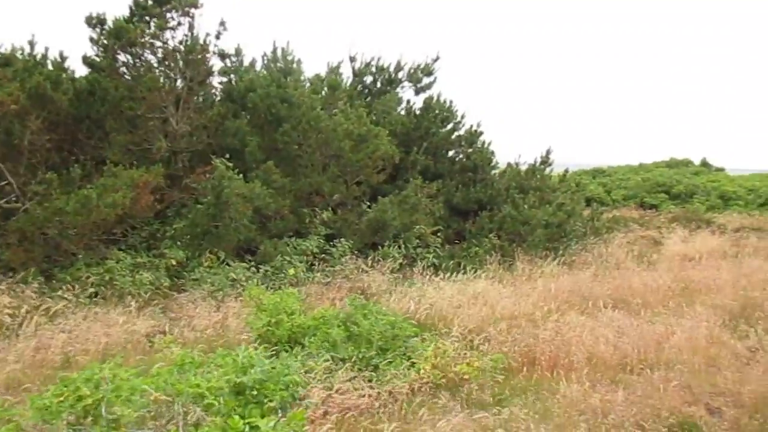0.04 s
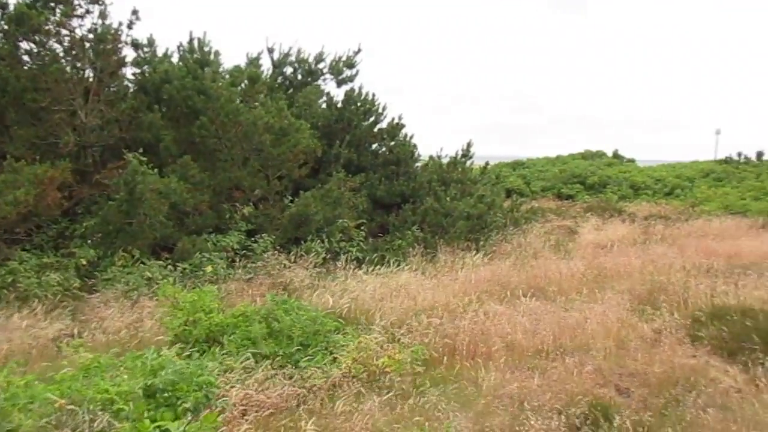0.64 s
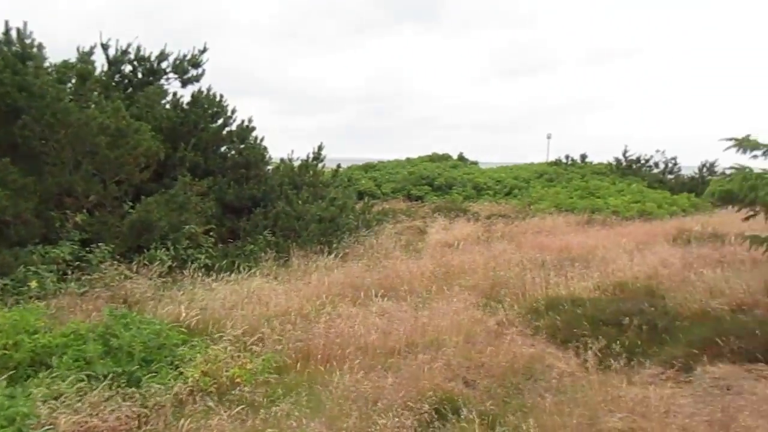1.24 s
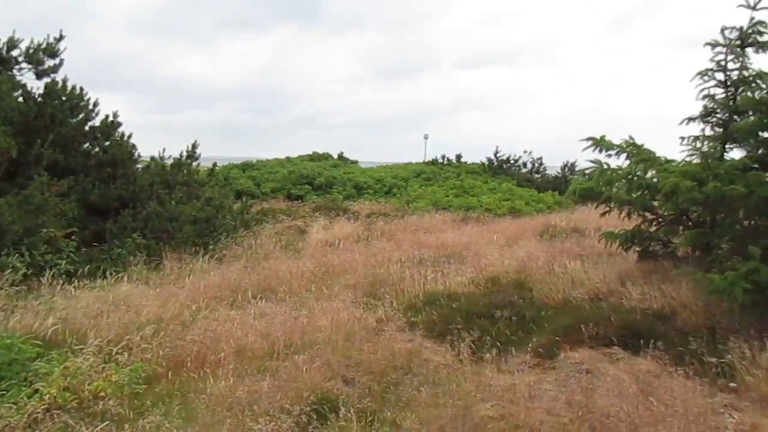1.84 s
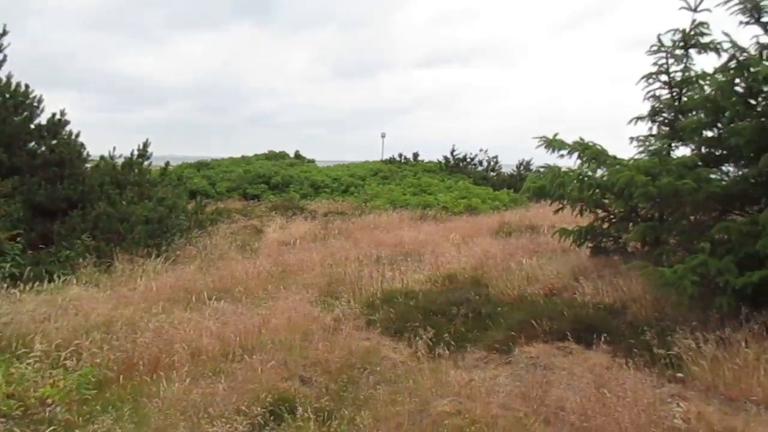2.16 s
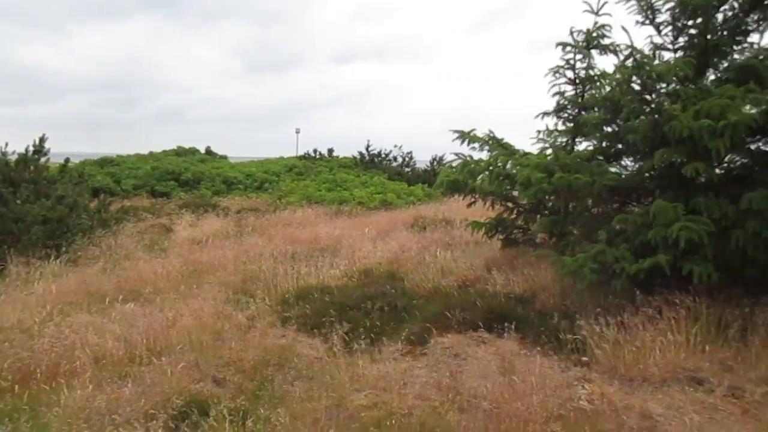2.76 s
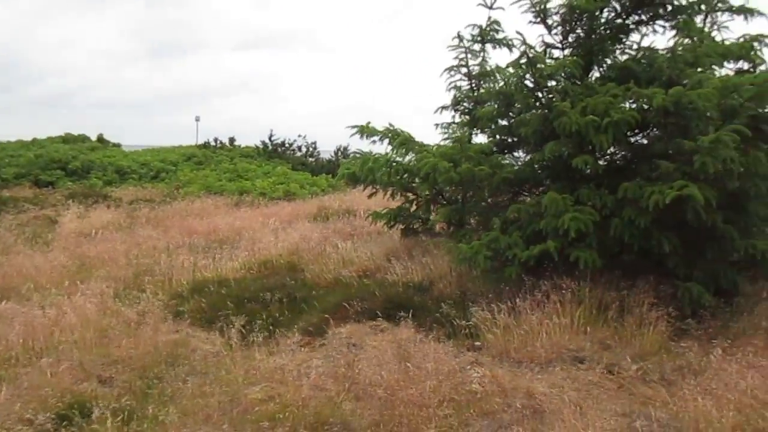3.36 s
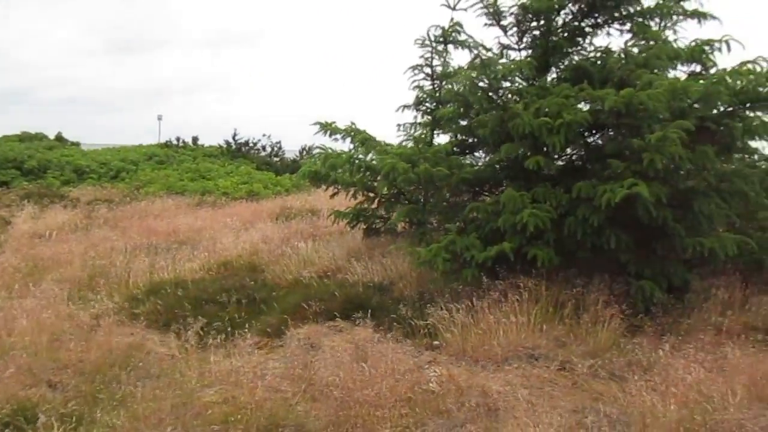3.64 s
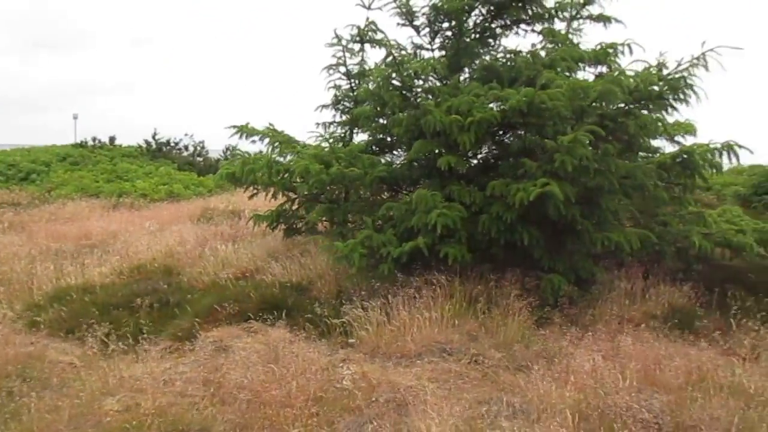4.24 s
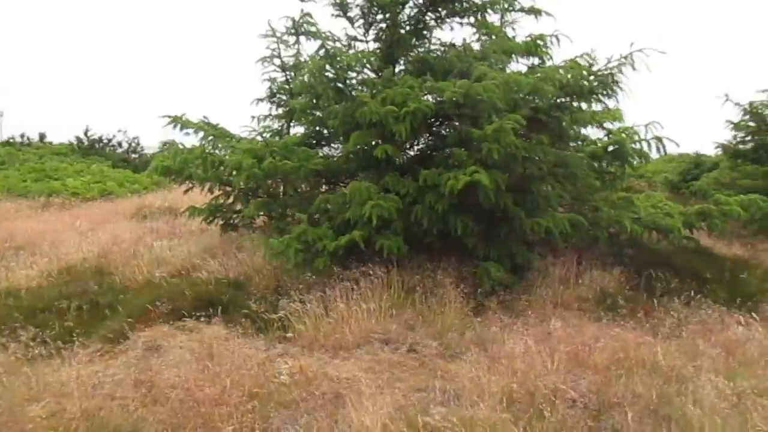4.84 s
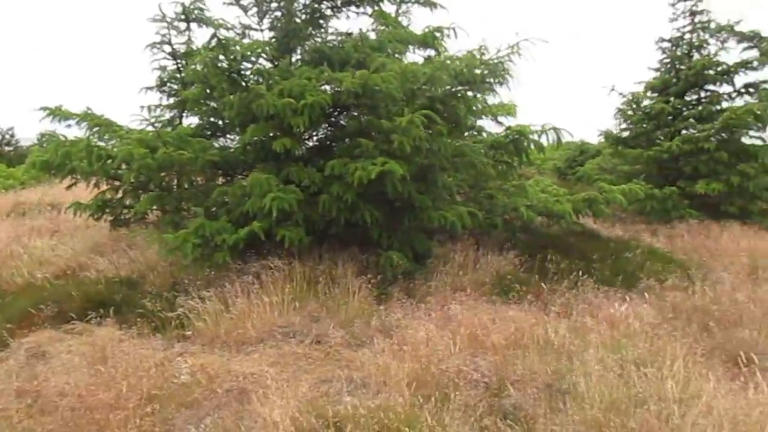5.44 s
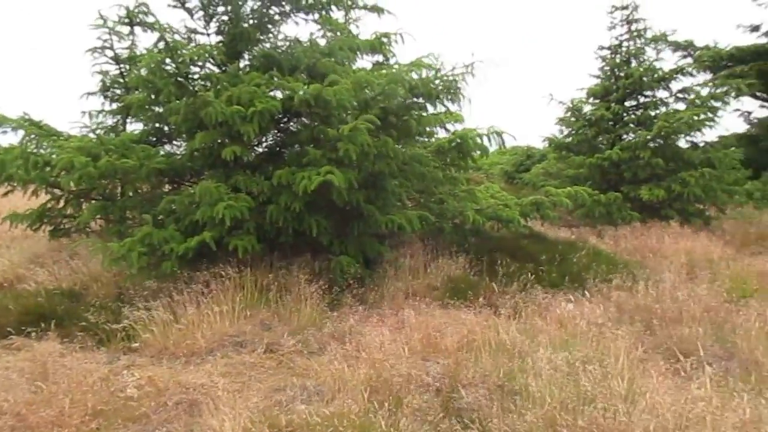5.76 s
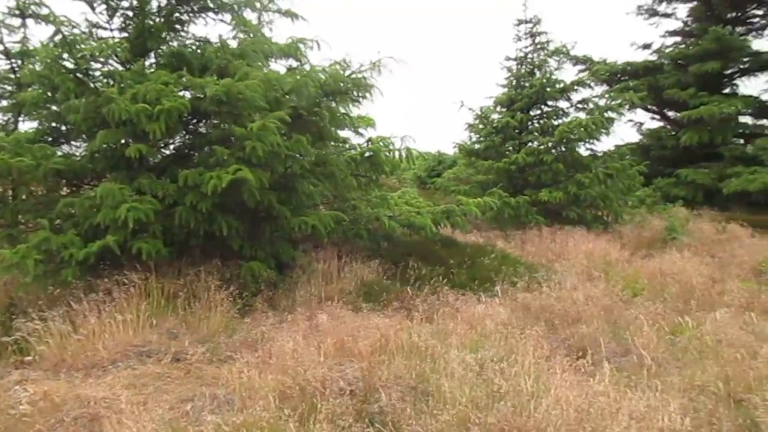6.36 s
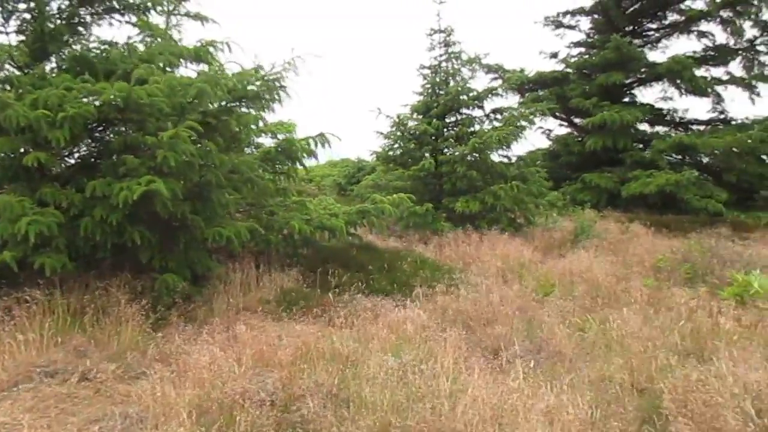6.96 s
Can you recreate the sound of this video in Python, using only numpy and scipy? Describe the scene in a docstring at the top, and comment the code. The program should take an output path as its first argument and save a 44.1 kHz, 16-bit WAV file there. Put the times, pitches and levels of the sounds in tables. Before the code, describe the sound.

Uneven gusts rumble and thump against the microphone outdoors, while a faint rush of wind in conifers slowly grows.

```python
"""Low, gusty wind buffets the microphone on a heath, with thumps from hard eddies.
Each gust swells and fades by the same rule and carries eddies; the hardest makes the limiter duck briefly.
Behind it conifer needles roar and dry grass rustles, louder as the camera turns towards a spruce.
The camera casing clicks a few times in the hand."""
import sys
import numpy as np
from scipy import signal
from scipy.fft import rfft, irfft, next_fast_len
from scipy.io import wavfile
from scipy.ndimage import uniform_filter1d, minimum_filter1d, map_coordinates

SR = 44100
rng = np.random.default_rng(int(sys.argv[2]) if len(sys.argv) > 2 else 0)


def pcm_store(signal):
    """Save signal as 16-bit PCM."""
    levels = np.round(np.clip(np.atleast_2d(signal), -1, 1) * 32767)
    wavfile.write(sys.argv[1], SR, levels.astype(np.int16).T)


N = 317079
TIME = np.arange(N) / SR
CUTOFF_HZ = 15680

# Short gusts on long surges: start t/s, hold/s, level/dB
GUSTS = [(0.038, 0.021, -27), (0.324, 0.089, -33), (0.452, 2.73, -31), (0.453, 0.076, -24),
         (0.607, 0.039, -23), (0.769, 0.17, -21), (1.02, .24, -22), (1.133, 0.048, -16.5),
         (1.38, .1, -21.5), (1.491, .14, -17.5), (1.69, 0.024, -23), (1.85, 0.23, -19.5),
         (1.908, 0.077, -18), (2.11, 0.051, -21), (2.229, .12, -27.5), (2.489, 0.019, -26.5),
         (2.58, 0.17, -23.5), (2.8, 0.081, -18.5), (2.95, 0.12, -28), (3.23, .08, -27.5),
         (3.497, 0.15, -17.5), (3.691, 0.068, -16.5), (3.831, 0.25, -26), (3.95, 0.051, -13),
         (4.34, .09, -26), (4.488, .02, -13), (4.52, 1.15, -28), (4.567, .13, -20), (4.82, .17, -19.5),
         (5.059, .25, -26), (5.139, 0.0099, -16.5), (5.371, 0.083, -16.5), (5.529, 0.074, -22),
         (5.643, .01, -13), (5.706, 0.0095, -13), (5.789, .14, -27), (6.033, 0.084, -28),
         (6.206, 0.0098, -22), (6.28, .01, -24.5), (6.617, 0.21, -30), (7.008, 0.019, -29.5)]


def gust_level_db(attack_s=.011, release_s=.022, draught_db=-38.5):
    """Gusts at the microphone port swell, hold and decay; they add in power over a steady draught."""
    power = from_db(draught_db) ** 2
    for start_s, hold_s, db in GUSTS:
        before_s = np.maximum(start_s - TIME, 0)
        after_s = np.maximum(TIME - start_s - hold_s, 0)
        fade = np.minimum(before_s / attack_s + after_s / release_s, 20)
        power = power + (from_db(db) * np.exp(-fade)) ** 2
    return 10 * np.log10(power)


# How squarely the port faces the wind as the camera turns: t/s, speed factor
FACING = [(0, .93), (1.3, 1.102), (3.1, 1.084), (3.7, .85), (4.9, .9), (6.1, .7), (7.19, .78)]


def wind_speed(gust_db, usual_gust_db=-22, slope_db_per_db=.2):
    """Air speed past the port, 1 = usual; rises with gust level and facing."""
    return in_time(FACING) * from_db(slope_db_per_db * (gust_db - usual_gust_db))


# Eddy pressure spectrum at usual speed: f/Hz, relative level/dB
EDDY_SPECTRUM = [(12, -22.5), (30, -0.5), (55, -1), (100, -1), (160, -5.5), (250, -16), (400, -32.5),
                 (700, -40.5), (4000, -130)]


def buffeting(gust_db, mean_speed, swirl_speed_db=1.5, swirl_level_db=2.5, window_s=.053):
    """A frozen eddy field is carried past the port; faster wind is louder and higher."""
    swirl = drift(25.03)
    speed = np.clip(mean_speed * from_db(swirl_speed_db * swirl), .3, 2.5)
    field = noise(EDDY_SPECTRUM, lengths=2)
    pressure = map_coordinates(field, [np.cumsum(speed)], order=3, mode="wrap")
    # flatten the envelope so that gust and swirl set the level
    span = int(window_s * SR)
    power = uniform_filter1d(uniform_filter1d(pressure ** 2, span), span)
    return from_db(gust_db + swirl_level_db * swirl) * pressure / np.sqrt(power + 1e-6)


# Hardest eddies at the port: t/s, peak level/dB, centre f/Hz
HARD_EDDIES = [(0.329, -24, 245), (0.455, -19.5, 327), (0.764, -17.5, 310), (0.796, -20.5, 347),
               (1.061, -15, 267), (1.141, -12, 261.8), (1.183, -3.5, 450), (1.235, -14.5, 340),
               (1.378, -11, 317), (1.513, -9, 330.4), (1.585, -14, 300), (1.618, -8, 355.5),
               (1.911, -3, 295.6), (1.932, -1.5, 426), (1.936, -11.5, 943), (1.943, -2.5, 328.6),
               (1.9553, 4, 560), (1.962, -10.5, 1050), (1.9767, 4.5, 365), (1.98, -8, 819.3),
               (2.047, -14.5, 440), (2.06, -10.5, 400.1), (2.752, -15, 281.3), (2.811, -13, 450),
               (2.829, -8, 404), (2.884, -13, 290), (3.035, -19.5, 263.6), (3.7, -13, 271.1),
               (3.99, -11, 270.3), (4.507, -7.5, 310.6), (4.64, -8, 245.9), (4.819, -11, 367),
               (4.989, -14.5, 260), (5.148, -11, 190.1), (5.435, -9, 280.9), (5.648, -10, 279.5),
               (5.704, -11.5, 260.3)]


def eddy_thumps(lesser, cycles=.39, wake_db=-9.5, wake_s=.00615, wake_ratio=.63, wake_octaves=.52):
    """Each eddy, hard or lesser, is one steep pressure swing with two weaker, slower ones around it."""
    out = np.zeros(N + SR)
    offset = np.arange(-2 ** 11, 2 ** 11)
    is_wake = np.array([False, True, True])[:, None]
    for start_s, db, hz in HARD_EDDIES + lesser:
        shift, pitch, phase = rng.uniform(-1.068, 1, (3, len(is_wake), 1))
        lag_s = is_wake * wake_s * (shift + np.sign(shift) / 2)
        swing_hz = hz * np.where(is_wake, wake_ratio * 2 ** (wake_octaves * pitch), 1)
        turns = (offset / SR - lag_s) * swing_hz
        swings = np.exp(-(turns / cycles) ** 2) * np.cos(2 * np.pi * turns + np.pi * phase)
        swings /= np.abs(swings).max(axis=1, keepdims=True)
        out[round(start_s * SR) + offset] += np.sum(from_db(db + is_wake * wake_db) * swings, axis=0)
    return out[:N]


def lesser_eddies(gust_db, speed, rate_per_s=14, over_gust_db=.5, scatter_db=2.5, usual_hz=235):
    """Random eddies, as strong and quick as their gust. Rows: t/s, peak level/dB, centre f/Hz."""
    born = np.flatnonzero(rng.random(N) < rate_per_s / SR)
    peak_db = gust_db + over_gust_db + scatter_db * rng.uniform(-1, 1, N)
    return list(zip(TIME[born], peak_db[born], usual_hz * speed[born]))


# Breeze in the vegetation, rising with the turn to the spruce: t/s, base level/dB
BREEZE = [(0, -56), (.8, -53), (1.8, -51), (2.6, -52.5), (3.5, -48), (4.5, -45), (5.5, -41), (6.1, -39.5),
          (7.19, -38)]
# Needle roar: f/Hz, relative level/dB
CONIFER_SPECTRUM = [(60, -11.5), (200, -3.5), (400, -0.5), (560, -2), (900, -2.5), (1280, -4.5),
                    (1600, -2.5), (1850, -6), (2200, -11.5), (2800, -16), (3450, -18), (3900, -23),
                    (5000, -26), (9000, -49.5)]


def conifers(gain_db=4.5, sway_db=.15, sough_db=-11, sough_hz=1030, sough_width_hz=130):
    """Countless needles shed vortices: a smooth roar with a faint narrow-band sough."""
    roar = noise(CONIFER_SPECTRUM)
    band = signal.iirpeak(sough_hz, sough_hz / sough_width_hz, fs=SR)
    sough = unit_rms(signal.lfilter(*band, noise(CONIFER_SPECTRUM)))
    level_db = in_time(BREEZE) + gain_db + sway_db * drift(5.3)
    return from_db(level_db) * (roar + from_db(sough_db) * sough)


# Dry stem rustle: f/Hz, relative level/dB
GRASS_SPECTRUM = [(2500, -27), (5000, 1.5), (7000, 1), (7900, -1.5), (9200, -1), (12000, -7),
                  (15500, -13.5)]


def grass(gain_db=-21.5, touches_per_s=600, size_spread_db=3, ticks_db=-8, sway_db=1.1):
    """Dry stems brush each other in the same breeze: fine hiss with tiny ticks."""
    touches = (rng.random(N) < touches_per_s / SR) * rng.choice([-1, 1], N)
    sizes = from_db(size_spread_db * np.minimum(rng.exponential(1, N), 5))
    rustle = rng.standard_normal(N) + from_db(ticks_db) * unit_rms(touches * sizes)
    level_db = in_time(BREEZE) + gain_db + sway_db * drift(8)
    return from_db(level_db) * coloured(rustle, GRASS_SPECTRUM)


# Handling clicks: t/s, drive level/dB, centre f/Hz
CLICKS = [(2.955, -47, 11000), (3.5517, -15, 2861), (3.559, -39, 9500), (4.2644, -43.5, 9000),
          (4.594, -29, 6510), (4.8184, -38, 9900), (5.4735, -20, 1060), (5.4809, -37, 11990)]
# Modes of the casing and its small hard parts: f/Hz, relative level/dB, t60/s
CASING_MODES = [(560, -7, 0.0042), (1094, 11.5, 0.0067), (1690, -2, 0.0039), (2040, -2.5, 0.0079),
                (2800, -9.5, 0.0018), (3424, -25, 0.0034), (6300, -5, 0.0013), (8600, -10.5, .0015),
                (12200, -4, .0015)]


def casing_clicks(fall_db_per_octave=9.5, contact_ratio=3.1, rattle_db=-18.5, rattle_s=.0015):
    """A click rings the casing modes, most near its centre frequency; a loose part rattles briefly."""
    out, t = np.zeros(N), TIME[:2 ** 12]
    for start_s, drive_db, centre_hz in CLICKS:
        rattle = rng.standard_normal(len(t)) * np.exp(-t / rattle_s)
        blow = (t == 0) + from_db(rattle_db) * rattle
        body = np.zeros(len(t))
        for hz, db, t60_s in CASING_MODES:
            octaves_off = abs(np.log2(hz / centre_hz))
            body += from_db(db - fall_db_per_octave * octaves_off) * ring(blow, hz, t60_s)
        # soft contact rounds the attack
        contact = signal.butter(2, min(contact_ratio * centre_hz, CUTOFF_HZ), fs=SR, output="sos")
        out[round(start_s * SR) + np.arange(len(t))] += from_db(drive_db) * signal.sosfilt(contact, body)
    return out


# Nearby tufts: middle t/s, half-width/s, level/dB
SWISHES = [(.6, .05, -75), (2.98, .06, -74), (4.84, .07, -68), (6.963, 0.062, -61)]
# Seed head friction: f/Hz, relative level/dB
SWISH_SPECTRUM = [(5000, -17), (9500, 3), (12500, 0), (15500, -8)]


def tuft_swishes():
    """A tuft bends and its seed heads slide over each other: a short, airy swell."""
    swell = sum(from_db(db) * np.exp(-((TIME - mid_s) / half_s) ** 2) for mid_s, half_s, db in SWISHES)
    return swell * noise(SWISH_SPECTRUM)


def from_db(db):
    """Decibels to gain."""
    return 10 ** (np.asarray(db) / 20)


def unit_rms(x):
    """Scale to rms 1."""
    return x / np.sqrt(np.mean(x ** 2) + 1e-20)


def in_time(curve):
    """Rows of t/s, value, interpolated to every sample."""
    return np.interp(TIME, *np.transpose(curve))


def coloured(x, spectrum):
    """Filter by rows of f/Hz, level/dB; rms 1."""
    hz, db = np.transpose(spectrum)
    bins_hz = np.maximum(np.arange(len(x) // 2 + 1) * SR / len(x), 1)
    gain = from_db(np.interp(np.log(bins_hz), np.log(hz), db))
    return unit_rms(irfft(rfft(x) * gain, len(x)))


def noise(spectrum, lengths=1):
    """Coloured noise, lengths * N samples."""
    return coloured(rng.standard_normal(next_fast_len(lengths * N)), spectrum)[:lengths * N]


def drift(corner_hz):
    """Slow random wander; rms 1."""
    r = np.exp(-2 * np.pi * corner_hz / SR)
    return unit_rms(signal.lfilter([1], [1, -2 * r, r * r], rng.standard_normal(N + SR))[SR:])


def ring(drive, hz, t60_s):
    """Resonator: a unit impulse starts a decaying sine of height 1."""
    r, w = from_db(-60 / (t60_s * SR)), 2 * np.pi * hz / SR
    return signal.lfilter([0, np.sin(w)], [1, -2 * r * np.cos(w), r * r], drive + 1e-18)


def scene():
    """Vegetation in one breeze, plus gusts and handling at the microphone; mono."""
    gust_db = gust_level_db()
    speed = wind_speed(gust_db)
    heath = conifers() + grass() + tuft_swishes()
    close = casing_clicks() + buffeting(gust_db, speed) + eddy_thumps(lesser_eddies(gust_db, speed))
    return (heath + close)[None]


def limiter(x, threshold_db=-.5, ahead_s=.003, hold_s=.046, release_db_per_s=23):
    """Gain drops just ahead of a peak over threshold, holds, then creeps back."""
    ahead, hold = int(ahead_s * SR), int(hold_s * SR)
    needed_db = np.minimum(threshold_db - 20 * np.log10(np.abs(x) + 1e-9), 0)
    held_db = minimum_filter1d(needed_db, hold, origin=(hold - 1) // 2)
    ramp_db = release_db_per_s * TIME
    gain_db = ramp_db + np.minimum.accumulate(held_db - ramp_db, axis=-1)
    return x * from_db(uniform_filter1d(minimum_filter1d(gain_db, ahead), ahead))


def record(dry):
    """Microphone high-pass at 20 Hz, limiter, steep treble cut."""
    highpass = signal.butter(2, 20, "high", fs=SR, output="sos")
    lowpass = signal.ellip(12, .1, 90, CUTOFF_HZ, fs=SR, output="sos")
    return signal.sosfilt(lowpass, limiter(signal.sosfilt(highpass, dry)))


dry = scene()
out = record(dry)
pcm_store(out)
```